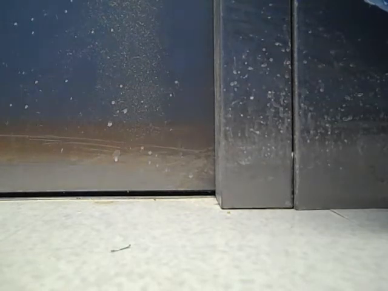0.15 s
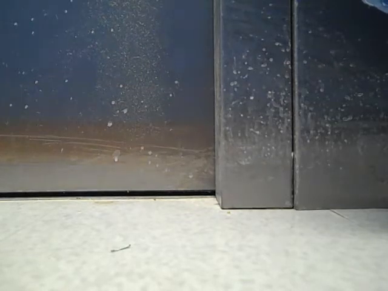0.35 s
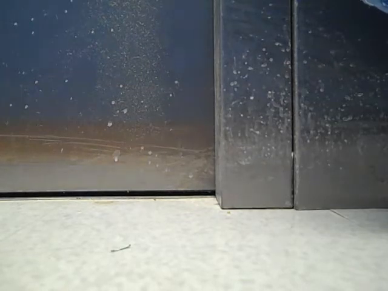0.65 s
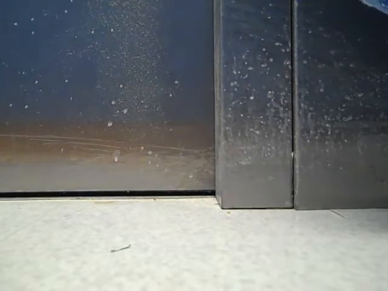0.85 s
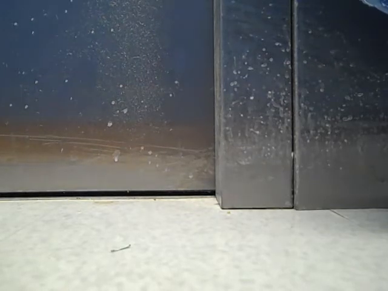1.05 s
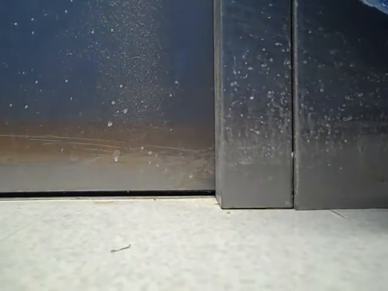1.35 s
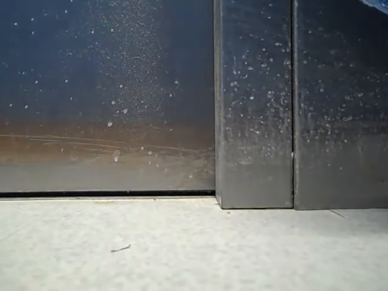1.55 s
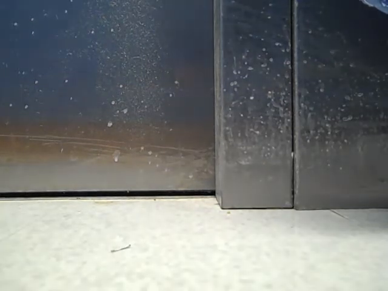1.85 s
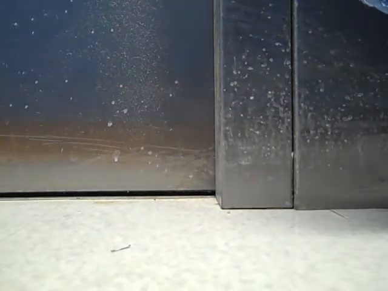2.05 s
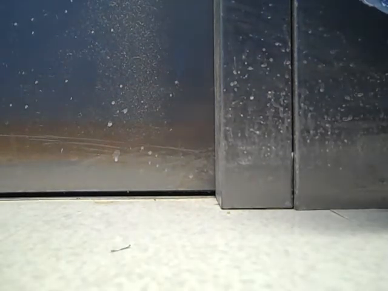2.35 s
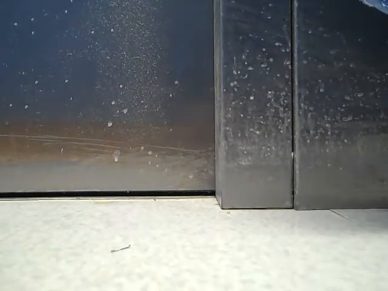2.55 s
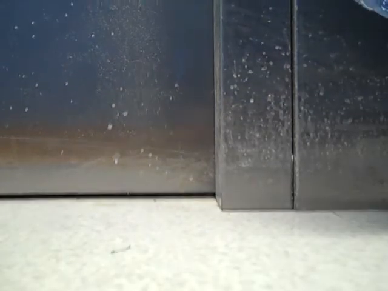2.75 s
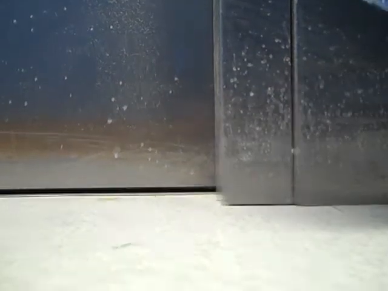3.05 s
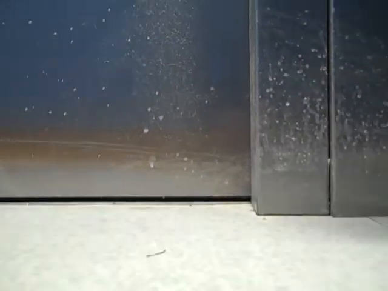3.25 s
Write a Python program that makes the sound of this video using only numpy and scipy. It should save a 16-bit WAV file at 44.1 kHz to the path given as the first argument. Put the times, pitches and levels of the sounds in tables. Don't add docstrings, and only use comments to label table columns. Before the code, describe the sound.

A hydraulic elevator hums steadily inside a small steel cab, a low tonal drone near 115 and 230 hertz, wavering more strongly toward the end. Dull panel rumble surges briefly around 1.7 seconds, over very faint hiss. Bright metallic ticks strike at 0.5 and 0.85 seconds. Soft cloth and sole scuffs begin at 1.2, with tiny dry clicks from 1.45 and a clearer one near 2.75.

```python
import sys
import numpy as np
from scipy import signal
from scipy.fft import rfft, irfft
from scipy.io import wavfile

SR = 44100
rng = np.random.default_rng(int(sys.argv[2]) if len(sys.argv) > 2 else 0)


def waveform_to_disk(signal):
    frames = np.transpose(np.atleast_2d(signal))
    scaled = np.clip(frames, -1, 1) * 32767
    samples = np.round(scaled).astype(np.int16)
    wavfile.write(sys.argv[1], SR, samples)


def amplitude_ratio(level_db):
    exponent = np.asarray(level_db, float) / 20
    return 10 ** exponent


N = 149940
T = np.arange(N) / SR
HZ = np.maximum(np.arange(N // 2 + 1) * SR / N, 1.0)

# f/Hz, density/dB per Hz
AIR_SPECTRUM = [(1500, 5), (3000, -5), (5000, -4.5), (7500, -6), (9500, -12), (11500, -12.5),
                (14500, -15.5)]


def rms_one(x):
    return x / np.sqrt(np.mean(x ** 2) + 1e-20)


def at_hz(points):
    hz, value = np.transpose(points)
    return np.interp(np.log(HZ), np.log(hz), value, right=value[-1])


def bumps_db(rows):
    return sum(db / (1 + (2 * (HZ - hz) / width) ** 2) for hz, width, db in rows)


def colour(x, gain):
    return irfft(rfft(x) * gain, N)


def drift(rate_per_s):
    pole = np.exp(-80 * np.pi * rate_per_s / SR)
    noise = rng.standard_normal(N // 40 + 2002)
    slow = signal.lfilter([1], [1, -2 * pole, pole * pole], noise)[2000:]
    return np.interp(np.arange(N) / 40, np.arange(len(slow)), rms_one(slow))


def pair(likeness):
    mid, side = rng.standard_normal((2, N))
    likeness = np.clip(likeness, 0, 1)
    mid = colour(mid, np.sqrt(1 + likeness))
    side = colour(side, np.sqrt(1 - likeness))
    return np.array([mid + side, mid - side]) / np.sqrt(2)


def dying(start_s, t60_s):
    return (T >= start_s) * amplitude_ratio(-60 * np.maximum(T - start_s, 0) / t60_s)


def sides(pan_db):
    return amplitude_ratio(np.array([[pan_db / 2], [-pan_db / 2]]))


def pump():
    # t/s, second ripple order f/Hz, its level/dB
    load = [(0.0, 232.0, -31), (0.06, 229.4, -35), (0.56, 229.2, -34), (1.35, 230.6, -31),
            (1.37, 230.8, -37.5), (1.48, 231.1, -30.5), (2.14, 229.2, -30.5), (2.23, 229.2, -35.5),
            (2.4, 231.0, -29.5), (2.55, 230.8, -34.5), (2.74, 230.6, -28.5), (2.85, 230.7, -33.5),
            (2.87, 230.7, -51.5), (2.9, 231.7, -29.5), (3.27, 231.9, -27), (3.3, 231.9, -35),
            (3.34, 233.2, -25), (3.4, 234.8, -39)]
    # order, level re second/dB, share of load swing, wobble/dB, left-right/dB
    ripple_orders = [(1, -6, 0.37, 2, -1.5), (2, 0, 0.91, 0.84, 0.6), (3, -14.5, 0.19, 2.5, -1.2),
                     (4, -30.5, .3, 6.5, 10.5), (5, -26, .3, 4, -3), (7, -29, 0.25, -3, -3),
                     (8, -38, 0.28, 7, -7), (9, -36, .3, 5, -5.5), (10, -51, .3, 6, -1.5),
                     (11, -42.5, 0.43, 8, 3)]
    motor_hz, motor_db = 59.1, -51
    wobble_per_s, phase_jitter_rad = 6, 0.14

    t_s, second_hz, second_db = np.transpose(load)
    turn_rad = np.pi * np.cumsum(np.interp(T, t_s, second_hz)) / SR
    load_db = np.interp(T, t_s, second_db)
    mean_db = load_db.mean()
    out = amplitude_ratio(motor_db + 0.5 * drift(2.5)) * np.sin(2 * np.pi * motor_hz * T)
    for order, order_db, share, wobble_db, pan_db in ripple_orders:
        order = round(order)
        swing_db = share * (load_db - mean_db)
        gain = amplitude_ratio(mean_db + order_db + swing_db + wobble_db * drift(wobble_per_s))
        jitter_rad = order * phase_jitter_rad * drift(wobble_per_s)
        phase_rad = order * turn_rad + rng.uniform(0, 2 * np.pi) + jitter_rad
        out = out + gain * sides(pan_db) * np.sin(phase_rad)
    return np.sqrt(2) * out


def rumble():
    # f/Hz, density/dB per Hz
    flow_spectrum = [(25, -0.5), (55, -5), (140, -5), (300, 1.5), (520, -5.5), (900, -16.5), (1800, -26.5),
                     (3300, -34.5)]
    panel_hz = [85, 148, 178, 297, 312, 378, 545, 615, 670, 725, 815, 980, 1310, 2570]
    # width/Hz, boost/dB (negative = notch)
    panel_shapes = [(13.9, 10), (24, 7.5), (10, -9.5), (12.2, -3.5), (14, 3), (25, -4.5), (48.5, -4.5),
                    (39.8, -6), (40, 3.5), (40, -3.5), (70, 5), (60, -4.5), (90, 0), (160, 5.5)]
    # f/Hz, left-right correlation
    flow_likeness = [(60, 0.98), (300, 1), (600, 1), (1300, .8), (2800, 0.63), (5000, .1)]
    # t/s, length/s, boost/dB
    surges = [
        (.15, 0.6, 0.5),
        (1.27, 0.18, 2.5),
        (1.693, 0.13, 6),
        (3.082, 0.27, 1.5),
    ]
    rumble_db, patchy_db = -37, 0.83

    panels = [(hz, *shape) for hz, shape in zip(panel_hz, panel_shapes)]
    steep = 1 / np.sqrt(1 + (HZ / 3800) ** 6)
    spectrum = amplitude_ratio(at_hz(flow_spectrum) + bumps_db(panels)) * steep
    shaped = rms_one(colour(pair(at_hz(flow_likeness)), spectrum))
    surge_db = sum(db * np.exp(-(2 * (T - s) / length_s) ** 2) for s, length_s, db in surges)
    octave = np.log2(HZ / 30).clip(0, 7)
    out = 0
    for k in range(8):
        swell_db = patchy_db * drift(2.1) + surge_db * (k in (3, 4))
        band = np.clip(1 - abs(octave - k), 0, 1)
        out = out + colour(shaped, band) * amplitude_ratio(swell_db)
    return amplitude_ratio(rumble_db) * out


def hiss():
    hiss_db, swell_db, likeness = -65.5, 0.6, 0.078
    low_cut = 1 / np.sqrt(1 + (1500 / HZ) ** 4)
    air = rms_one(colour(pair(likeness), amplitude_ratio(at_hz(AIR_SPECTRUM)) * low_cut))
    return amplitude_ratio(hiss_db + swell_db * drift(1.1)) * air


def near_noise():
    low_cut = 1 / np.sqrt(1 + (2300 / HZ) ** 4)
    return rms_one(colour(pair(0.25), amplitude_ratio(at_hz(AIR_SPECTRUM)) * low_cut))


def ticks(bright):
    # t/s, peak/dB, left-right/dB
    strikes = [
        (0.5234, -34.5, 4.5),
        (0.847, -32.5, 0),
    ]
    mode_hz = [3100, 5730, 6780, 6980, 7750, 8150, 8550, 8800, 9400, 10100, 11600, 13300, 13700]
    # level/dB, t60/s
    mode_decays = [(-7, 0.033), (-9.5, 0.092), (7.5, 0.032), (-7, .04), (-6.5, .03), (-19.5, 0.025),
                   (0.5, 0.014), (-11, 0.024), (-11, .025), (-19, .03), (-16, .05), (-11.5, .02),
                   (-5.5, .02)]
    modes_db, mode_spread_db = -18, 2.5
    crack_db, crack_t60_s = -21.5, 0.01
    tail_db, tail_t60_s = -25, 0.26
    tail_low_hz, tail_high_hz = 5700, 9000

    tail_band = 1 / np.sqrt(1 + (tail_low_hz / HZ) ** 26 + (HZ / tail_high_hz) ** 12)
    thin = rms_one(colour(bright, tail_band))
    out = 0
    for s, db, pan_db in strikes:
        for hz, (mode_db, t60_s) in zip(mode_hz, mode_decays):
            gain = amplitude_ratio(mode_db + modes_db + db + rng.normal(0, mode_spread_db, (2, 1)))
            phase_rad = rng.uniform(0, 2 * np.pi, (2, 1))
            ring = dying(s, t60_s) * np.sin(2 * np.pi * hz * (T - s) + phase_rad)
            out = out + gain * sides(pan_db) * ring
        crack = amplitude_ratio(crack_db) * dying(s, crack_t60_s) * bright
        tail = amplitude_ratio(tail_db) * dying(s, tail_t60_s) * thin
        out = out + sides(pan_db) * amplitude_ratio(db) * (crack + tail)
    return out


def scuffs(bright):
    # start/s, length/s, level/dB, left-right/dB
    rubs = [
        (1.227, 0.099, -64, -2),
        (1.36, 0.39, -61.5, 0.1),
        (1.5, 0.59, -64, 0.1),
        (2.36, 0.052, -70, 8),
        (2.675, 0.073, -67.5, -2),
        (2.975, 0.054, -59, -11.5),
    ]
    # f/Hz, width/Hz, boost/dB
    hollow_tones = [(2000, 450, 14), (3950, 350, 11), (6700, 400, 5)]
    grain_db, grains_per_s = 1.5, 60
    edge_share, high_hz = 0.75, 9500

    soft = colour(bright, 1 / np.sqrt(1 + (HZ / high_hz) ** 4))
    hollow = colour(soft, amplitude_ratio(bumps_db(hollow_tones)))
    grain = amplitude_ratio(grain_db * drift(grains_per_s))
    out = 0
    for k, (s, length_s, db, pan_db) in enumerate(rubs):
        edge_s = edge_share * length_s / 2
        swell = np.clip(np.minimum(T - s, s + length_s - T) / edge_s, 0, 1)
        rub = hollow if k == 1 else soft
        out = out + amplitude_ratio(db) * sides(pan_db) * swell * grain * rub
    return out


def clicks(bright):
    # t/s, peak/dB, left-right/dB
    contacts = [
        (1.449, -48, 0.5),
        (1.589, -48.5, 1.5),
        (1.659, -50, -0.5),
        (2.741, -43, 0),
        (2.968, -49.5, -2.5),
        (3.177, -51, -5),
    ]
    click_db, t60_s = -8.5, 0.019
    return sum(amplitude_ratio(db + click_db) * sides(pan_db) * dying(s, t60_s) * bright for s, db, pan_db in contacts)


def scene():
    steady = pump() + rumble() + hiss()
    bright = near_noise()
    return steady + ticks(bright) + scuffs(bright) + clicks(bright)


def top_cut(x):
    return signal.sosfilt(signal.butter(12, 14200, fs=SR, output="sos"), x)


def record(dry):
    # bass cut/Hz, cavity f/Hz, width/Hz, boost/dB, gain/dB
    port_shapes = [
        (151, 7820, 3400, 13.5, -0.8),
        (40, 6520, 2750, 11.5, -0.75),
    ]
    ports = np.array([amplitude_ratio(gain_db + bumps_db([(hz, width_hz, db)])) / (1 - 1j * cut_hz / HZ)
                      for cut_hz, hz, width_hz, db, gain_db in port_shapes])
    right_air_db = -4.5 / (1 + (9000 / HZ) ** 4)
    ports[1] *= amplitude_ratio(bumps_db([(8500, 2500, 0.5)]) + right_air_db)
    ports *= HZ < 14200
    return top_cut(colour(dry, ports))


dry = scene()
out = record(dry)
waveform_to_disk(out)
```